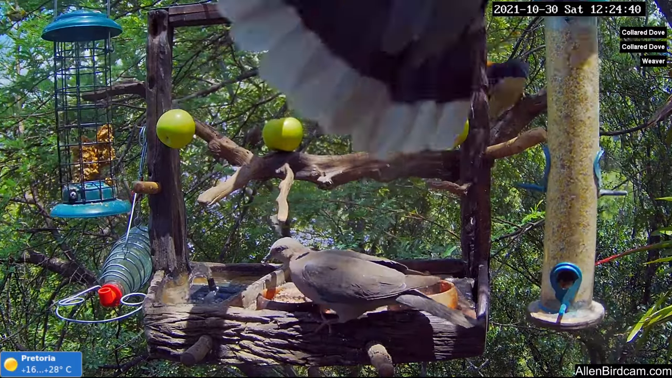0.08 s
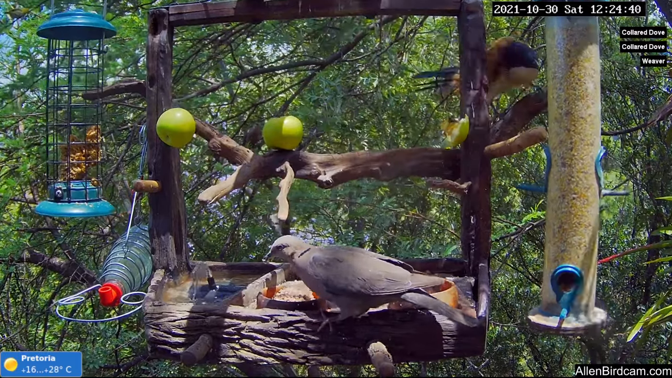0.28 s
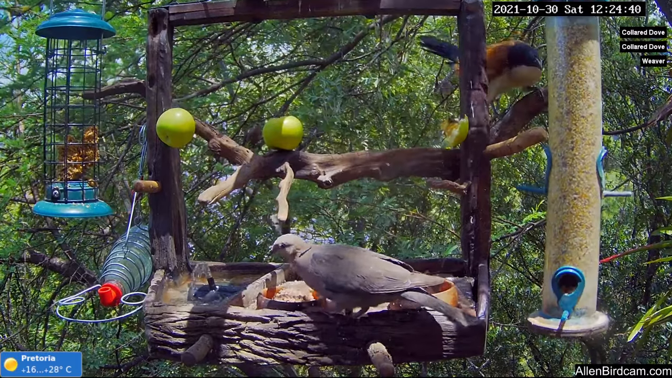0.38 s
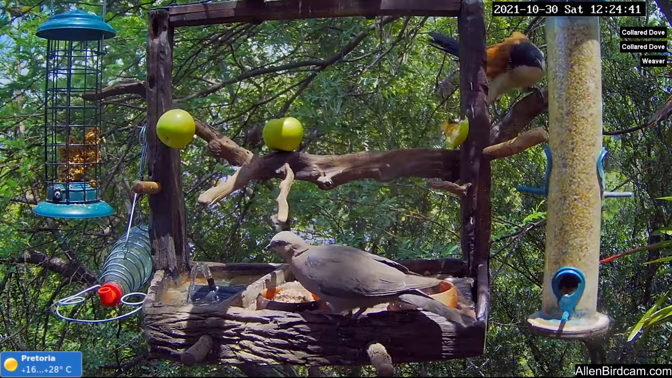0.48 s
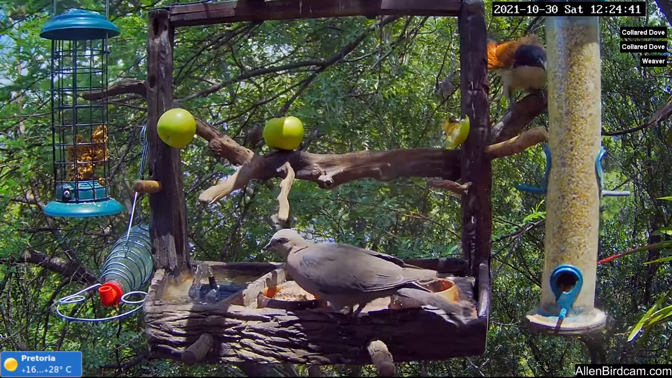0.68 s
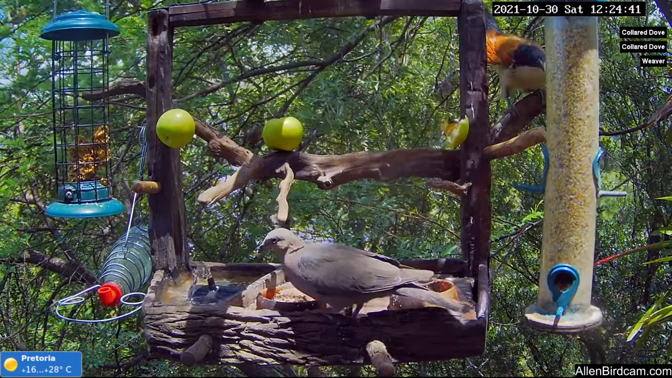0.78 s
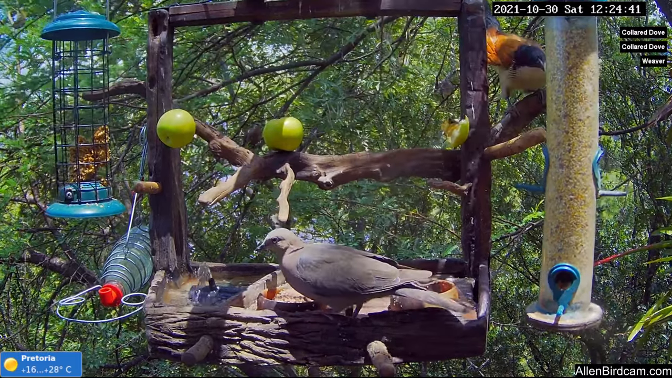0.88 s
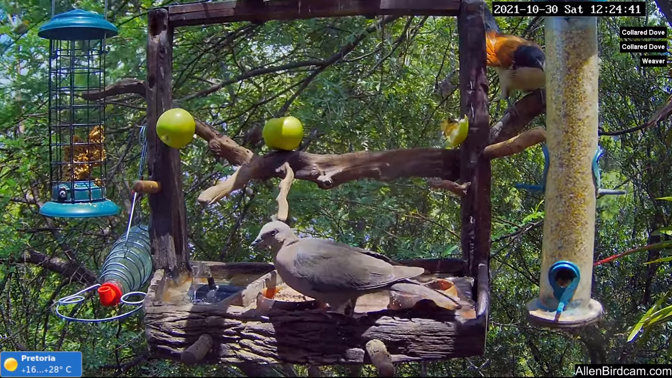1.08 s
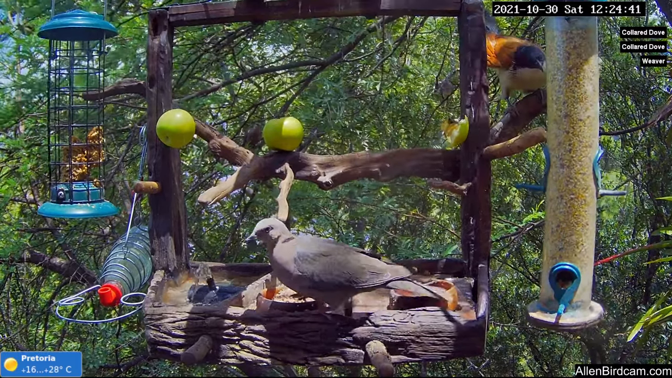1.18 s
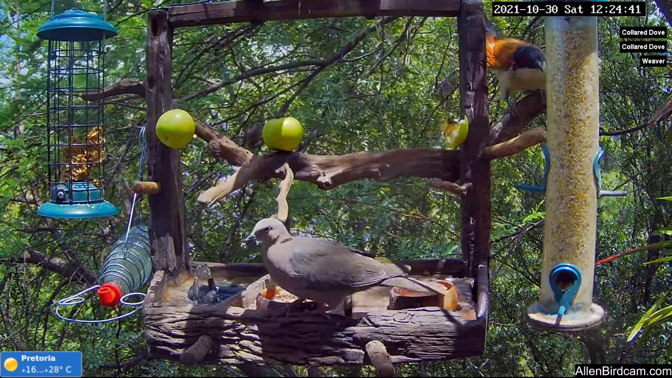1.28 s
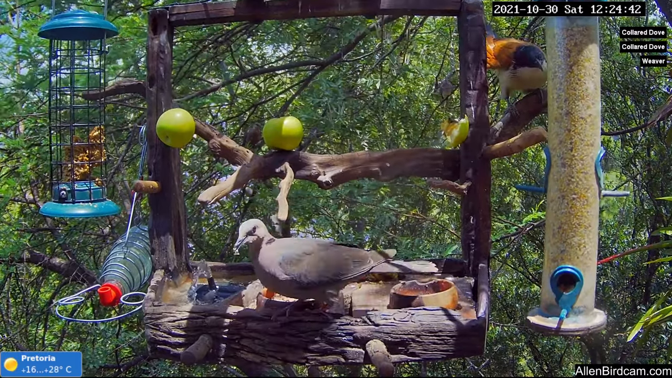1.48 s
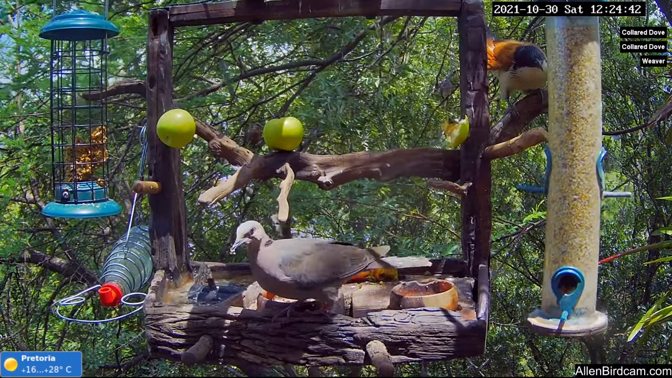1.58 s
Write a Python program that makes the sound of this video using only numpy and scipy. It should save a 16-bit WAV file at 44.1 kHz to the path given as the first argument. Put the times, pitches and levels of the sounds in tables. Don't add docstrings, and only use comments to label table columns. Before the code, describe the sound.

Loud wingbeats of a departing dove start at once, with a sharp feather clap and knocks on the feeder. Quick flaps follow until about 0.45 s, with thin falling whistles from 0.13 to 0.3 s and heavy overloaded air thumps near 0.22 and 0.33 s. Buffeting fades over low distant rumble. Seeds tick sparsely; small birds chirp at 0.8-0.94 s, a faint insect hums from 0.9 s, and a harsh call rasps at 1.1 s.

```python
import sys
import numpy as np
from scipy import signal
from scipy.fft import rfft, irfft
from scipy.io import wavfile
from scipy.ndimage import uniform_filter1d, map_coordinates

SR = 44100
rng = np.random.default_rng(int(sys.argv[2]) if len(sys.argv) > 2 else 0)


def decibels_to_gain(level_db):
    exponent = np.asarray(level_db, float) / 20
    return 10 ** exponent


def bounce(signal):
    frames = np.transpose(np.atleast_2d(signal))
    limited = np.clip(frames, -1, 1)
    pcm = np.round(limited * 32767).astype(np.int16)
    wavfile.write(sys.argv[1], SR, pcm)


N = 70560


def unit(x):
    return x / np.sqrt(np.mean(x ** 2) + 1e-20)


def curve(rows, t):
    s, *cols = np.transpose(rows)
    return [np.interp(t, s, c) for c in cols]


def swell(rows):
    s, db = np.transpose(rows)
    return decibels_to_gain(np.interp(np.arange(N) / SR, s, db, left=-150, right=-150))


def bursts(s, db, length_s):
    t = np.arange(N) / SR
    shape = np.exp(-((t - s[:, None]) / length_s[:, None]) ** 2)
    return (decibels_to_gain(db)[:, None] * shape).sum(0)


def wobble(rate_hz):
    knots = rng.standard_normal(int(N * rate_hz / SR) + 4)
    return map_coordinates(knots, [np.arange(N) * rate_hz / SR])


def noise(spectrum, patchy_db=0):
    z = signal.stft(rng.standard_normal(N + 8192), nperseg=256)[2]
    field = uniform_filter1d(rng.standard_normal(z.shape), size=8, axis=0)
    field = uniform_filter1d(field, size=7, axis=1)
    x = signal.istft(z * decibels_to_gain(patchy_db * unit(field)), nperseg=256)[1]
    hz, db = np.transpose(spectrum)
    bins_hz = np.fft.rfftfreq(len(x), 1 / SR)
    gain = decibels_to_gain(np.interp(np.log(bins_hz + 1), np.log(hz + 1), db, left=-60))
    return unit(irfft(rfft(x) * gain, len(x))[:N])


def tone(rows, partials, waver):
    glide_s, fade_s = .003, .003
    t = np.arange(N) / SR
    hz, db = curve(rows, t)
    hz = uniform_filter1d(hz, size=round(glide_s * SR))
    phase = 2 * np.pi * np.cumsum(hz * (1 + waver * wobble(300))) / SR
    wave = sum(decibels_to_gain(g + 2.4 * wobble(250)) * np.sin(k * phase) for k, g in partials)
    to_edge_s = np.minimum(t - rows[0][0], rows[-1][0] - t)
    return np.sqrt(2) * decibels_to_gain(db) * wave * np.clip(to_edge_s / fade_s, 0, 1)


def wings():
    # (time [s], feather rush [dB], body thud [dB], length [s])
    beats = [(0.01, -27.5, -37, 0.0023), (.018, -36.5, -29.5, 0.0067), (0.065, -43, -32, 0.0021),
             (0.105, -49.5, -36.5, 0.034), (0.178, -45, -31, 0.0033), (0.227, -48.5, -35.5, 0.014),
             (0.334, -46, -28.5, 0.0056), (0.331, -50.5, -54, 0.027), (0.424, -59, -44, 0.0087),
             (.136, -56, -41, 0.0026), (0.203, -49.5, -45, .002), (0.213, -52, -47, 0.0015)]
    # (time [s], level [dB], length [s])
    shakes = [(.009, -34.5, 0.001), (0.053, -56, 0.0038), (0.084, -35.5, 0.0013), (0.178, -54, 0.0012),
              (0.32, -48, 0.0026), (0.336, -47, .005), (0.422, -44.5, 0.0025), (.429, -45, 0.0059),
              (0.442, -56, 0.0033)]
    # (time [s], level [dB])
    stir = [(0, -48.5), (.1, -51), (.25, -53), (.36, -59), (.46, -61), (.55, -74), (.66, -80.5),
            (1.6, -110)]
    # (frequency [Hz], density [dB per Hz])
    feather = [(700, -20), (1500, 5.5), (2400, 7), (5800, 6), (8300, 7.5), (12800, -8), (14300, -17.5),
               (16000, -42)]
    rustle_colour = [(880, -40), (1500, -17.5), (2420, -38.5), (2600, -4), (3940, -3), (4230, 2),
                     (5860, 4.5), (11100, -11), (13000, -23.5), (15500, -44), (22000, -120)]
    body = [(76, -28.5), (130, -3), (182, -12), (266, 2), (298, -6), (735, -9.5), (2500, -33.5),
            (3250, -58), (5500, -120)]

    s, rush_db, thud_db, length_s = np.transpose(beats)
    rush_noise = unit(decibels_to_gain(2.5 * wobble(500)) * noise(feather, patchy_db=1.2))
    rush = bursts(s, rush_db, length_s) * rush_noise

    stir_db, = curve(stir, np.arange(N) / SR)
    rustle_noise = unit(decibels_to_gain(1.6 * wobble(250)) * noise(rustle_colour, patchy_db=2.5))
    rustle = (decibels_to_gain(stir_db) + bursts(*np.transpose(shakes))) * rustle_noise

    start_db = stir[0][1]
    body_db = start_db + 8 + 0.84 * (stir_db - start_db)
    thud = bursts(s, thud_db, length_s) + decibels_to_gain(body_db + 3.5 * wobble(37.2))
    thud_noise = unit(decibels_to_gain(0.9 * wobble(116.4)) * noise(body, patchy_db=2.0))
    return rush + rustle + thud * thud_noise


def downwash():
    # (time [s], level [dB])
    buffet = [(0, -27), (.14, -22), (.22, -25), (.34, -30.5), (.42, -17), (.55, -31.5), (.7, -37),
              (.83, -32), (1, -32.5), (1.1, -37), (1.3, -46.5), (1.6, -45)]
    # (frequency [Hz], density [dB per Hz])
    gust = [(5, 6), (10, 5.5), (25, -8), (61, -5.5), (85, -14.5), (115, -36.5), (200, -23), (300, -75)]
    # (time [s], pressure ahead [full scale],
    # pressure behind [full scale], core ahead [s], core behind [s])
    vortices = [
        (.2228, 4.2, -2.15, .0066, .0108),
        (.3343, -4.1, 5.1, .009, .013),
        (.256, -.1, .6, .005, .012),
        (.139, -.5, .35, .012, .008),
    ]
    wake_fall, core_blur_s, vent_hz = 2.1, .0038, 9
    t = np.arange(N) / SR
    air = decibels_to_gain(curve(buffet, t)[0] + 3.22 * wobble(14.3)) * noise(gust)
    for s, ahead, behind, core_ahead_s, core_behind_s in vortices:
        u = np.where(t < s, (s - t) / core_ahead_s, (t - s) / core_behind_s)
        air = air + np.where(t < s, ahead, behind) * u / (1 + u * u) ** wake_fall
    air = uniform_filter1d(air, size=round(core_blur_s * SR))
    return signal.lfilter([1, -1], [1, -np.exp(-2 * np.pi * vent_hz / SR)], air)


def rumble():
    # (frequency [Hz], density [dB per Hz])
    far = [(95, 3), (125, -11.5), (183, -18), (271, -11.5), (450, -20.5), (676, -21.5), (1750, -41),
           (2000, -58.5), (5000, -54), (9000, -57.5), (15500, -66.5)]
    return decibels_to_gain(-53.5) * noise(far, patchy_db=2.0)


def ticks():
    # (time [s], peak [dB], ring [Hz], t60 [s])
    contacts = [ (.0095, -22, 600, .035), (.011, -21, 920, .025), (.012, -27, 350, .04),
                (.159, -40, 3200, .018), (.175, -31, 300, .03), (.222, -33, 720, .04),
                (.327, -26, 400, .04), (.328, -33, 900, .02), (.385, -37, 290, .06), (.419, -40, 620, .04),
                (.42, -45, 1050, .03), (.56, -54, 4900, .047), (.562, -61, 7130, .07),
                (.564, -62, 8660, .07), (.575, -40, 324, .07), (.661, -39, 285, .1),
                (.667, -51, 7090, .035), (.766, -54, 2660, .025), (.792, -60, 3710, .06),
                (.932, -64, 5500, .008), (.964, -39, 745, .037), (1.025, -52, 690, .06),
                (1.107, -57, 5340, .064), (1.108, -68, 6100, .25), (1.11, -68, 6700, .16),
                (1.219, -41, 297, .07), (1.2307, -49, 5330, .022), (1.244, -50, 2290, .04),
                (1.294, -57, 4450, .03), (1.297, -56, 1220, .04), (1.304, -69, 6500, .01),
                (1.34, -69, 5000, .006), (1.3905, -57, 7150, .015), (1.391, -58, 11000, .004),
                (1.391, -63, 1850, .04), (1.3913, -59, 5300, .018), (1.425, -68, 4100, .012),
                (1.4517, -58, 5600, .02), (1.482, -71, 8000, .005), (1.496, -69, 6800, .006),
                (1.5006, -60, 4300, .027), (1.502, -60, 6500, .015), (1.598, -45, 4500, .0017)]
    overtone, overtone_db = 1.33, -16
    crack_db, crack_t60_s = -10, .0041
    slap_s, slap_db = .0135, -15.5
    out, t = np.zeros(N + SR), np.arange(SR // 5) / SR
    for s, db, hz, t60_s in contacts:
        grit = rng.standard_normal(len(t))
        bright = np.clip(hz / 5000, 0, 1)
        rough = 1 + 2.5 * uniform_filter1d(grit, size=30) * bright
        modes = np.sin(2 * np.pi * hz * t)
        modes = modes + decibels_to_gain(overtone_db) * np.sin(2 * np.pi * overtone * hz * t)
        ring = decibels_to_gain(-60 * t / t60_s) * (1 - np.exp(-t * hz)) * rough * modes
        crack = decibels_to_gain(crack_db - 60 * t / crack_t60_s) * uniform_filter1d(grit, size=3) * bright ** 2
        out[round(s * SR):][:len(t)] += decibels_to_gain(db) * (ring + crack)
    slap = np.roll(out, round(slap_s * SR))
    return (out + decibels_to_gain(slap_db) * slap)[:N]


def trees(x):
    t60_s, first_s = .24, .004
    t = np.arange(SR // 2) / SR
    tail = rng.standard_normal(len(t)) * decibels_to_gain(-60 * t / t60_s) * (t > first_s)
    return signal.fftconvolve(x, tail / np.linalg.norm(tail))[:N]


def whistles():
    # (time [s], pitch [Hz], level [dB])
    glides = [
        [(.125, 5270, -55), (.135, 5200, -46.5), (.15, 5050, -35), (.166, 4800, -38.5), (.18, 4600, -45.5),
         (.2, 4300, -48), (.225, 4000, -45), (.243, 3650, -38.5), (.262, 3000, -42), (.289, 2430, -51)],
        [(.183, 5750, -55), (.205, 4600, -46.5), (.217, 4180, -36), (.226, 3950, -53), (.238, 3550, -44),
         (.26, 2650, -42.5), (.278, 2300, -61), (.297, 1800, -58), (.318, 1600, -54)],
        [(.254, 6000, -45), (.264, 5600, -46.5), (.28, 4900, -47.5), (.293, 4050, -51), (.299, 3950, -61)],
        [(.197, 950, -48), (.212, 1000, -43), (.22, 955, -41), (.226, 760, -30), (.233, 650, -43)],
    ]
    return sum(tone(note, [(0.99, 0)], .009) for note in glides)


def chirps():
    # (time [s], pitch [Hz], level [dB])
    calls = [
        [(.72, 2370, -94), (.735, 2350, -79.5), (.785, 2050, -71.5), (.79, 1883, -105)],
        [(.8, 1944, -62.5), (.812, 2314, -60), (.822, 2805, -42), (.842, 3018, -37.5), (.862, 2788, -44.5),
         (.872, 2270, -57), (.88, 1950, -73)],
        [(.874, 3680, -51.5), (.885, 3358, -51), (.901, 2653, -52), (.915, 2657, -57), (.927, 2955, -48),
         (.938, 3760, -64.5)],
        [(.88, 1760, -67), (.91, 1317, -71.5), (.935, 1530, -64)],
        [(1.5, 3140, -88), (1.55, 3540, -91), (1.57, 3140, -83)],
    ]
    # (time [s], level [dB])
    tweet = [(.8, -77), (.815, -60), (.83, -71), (.9, -73), (.99, -87)]
    # (frequency [Hz], density [dB])
    tweet_band = [(3800, -33), (4200, -2), (5100, -6), (5500, -23), (7000, -87)]
    clear = sum(tone(call, [(0.99, 0.0024)], .006) for call in calls)
    return clear + swell(tweet) * noise(tweet_band, patchy_db=-4)


def insect():
    # (time [s], pitch [Hz], level [dB])
    hum = [(.88, 1636, -73), (1.1, 1654, -80), (1.3, 1650, -86), (1.49, 1640, -79)]
    return tone(hum, [(0.98, 0)], .012)


def harsh_call():
    # (time [s], pitch [Hz], level [dB])
    main = [(1.082, 2980, -63), (1.095, 3058, -53), (1.099, 3300, -44), (1.102, 1996, -50),
            (1.108, 2505, -39.5), (1.114, 3397, -40), (1.118, 3718, -37.5), (1.1215, 2610, -37.5),
            (1.127, 2087, -43), (1.135, 2480, -51), (1.141, 2100, -50)]
    upper = [(1.122, 3600, -46), (1.13, 3155, -48), (1.134, 3400, -52), (1.139, 3863, -41),
             (1.143, 3700, -55), (1.146, 3924, -45.5), (1.15, 3400, -47), (1.157, 2840, -56)]
    lower = [(1.092, 1490, -60), (1.101, 1643, -56), (1.109, 1396, -62), (1.116, 1802, -48),
             (1.122, 1462, -56), (1.135, 1620, -65), (1.15, 1686, -58), (1.158, 1550, -60)]
    top = [(1.094, 3800, -58), (1.102, 4000, -53.5), (1.109, 4800, -47), (1.11, 3900, -53),
           (1.115, 4950, -44), (1.12, 4500, -48), (1.126, 4500, -46), (1.133, 4700, -57),
           (1.156, 4500, -64)]
    # (multiple [ratio], level [dB])
    partials = [(1, 0)]
    # (time [s], level [dB])
    rasp_swell = [(1.088, -75), (1.097, -48.5), (1.112, -38.5), (1.13, -44), (1.15, -47.5), (1.165, -64)]
    # (frequency [Hz], density [dB])
    rasp = [(900, -26), (1300, -17), (1600, -7), (2200, -4), (3300, 6), (4900, -9), (5600, -28),
            (7000, -46), (10000, -45)]
    strands = sum(tone(rows, partials, .012) for rows in (main, upper, lower, top))
    return strands + swell(rasp_swell) * noise(rasp)


def scene():
    near = ticks() + whistles() + chirps() + insect() + harsh_call()
    echoes = decibels_to_gain(-15) * trees(near)
    return (wings() + downwash() + rumble() + near + echoes)[None]


def top_cut(x):
    return signal.sosfilt(signal.butter(12, 15740, fs=SR, output="sos"), x)


def record(dry):
    limit = .953
    mix = np.clip(dry, -limit, limit)
    return top_cut(mix)


dry = scene()
out = record(dry)
bounce(out)
```